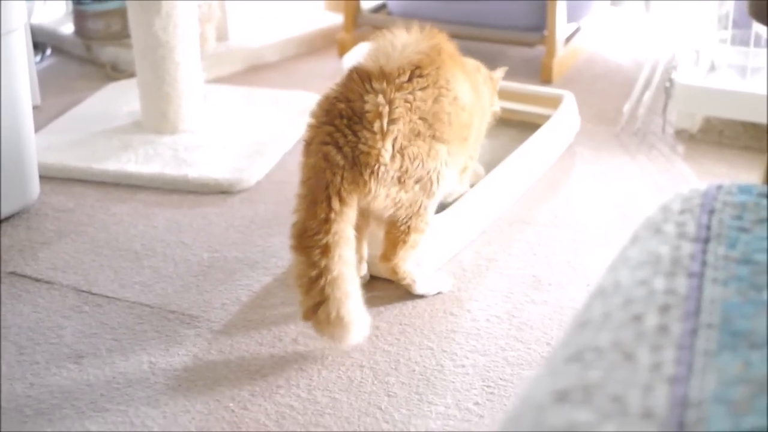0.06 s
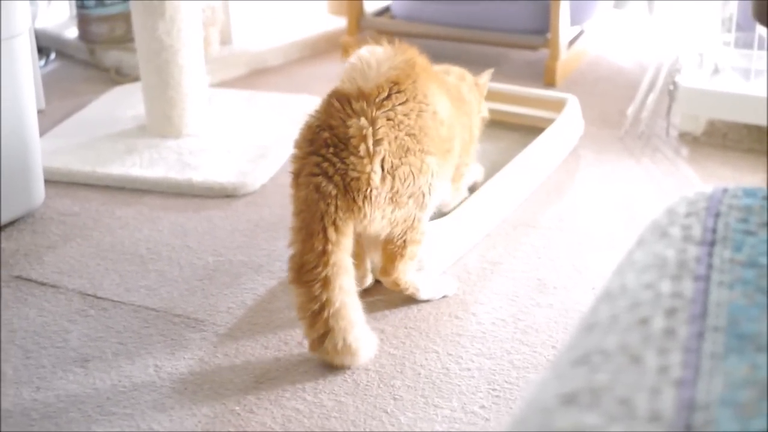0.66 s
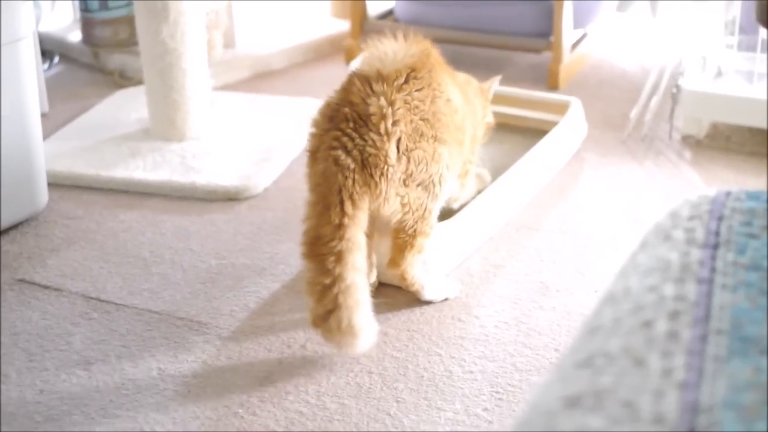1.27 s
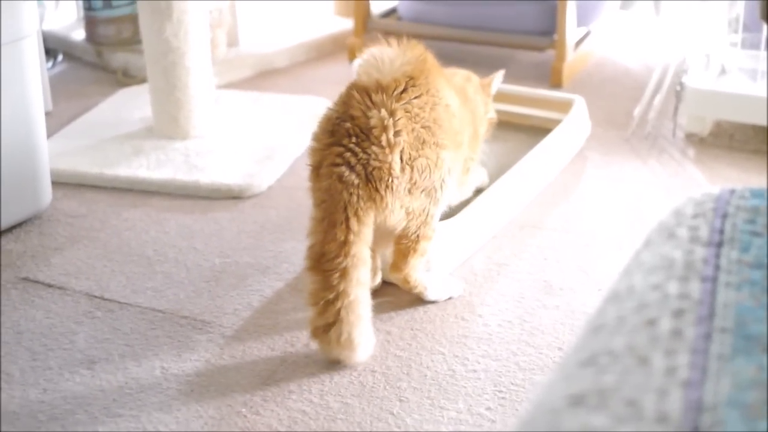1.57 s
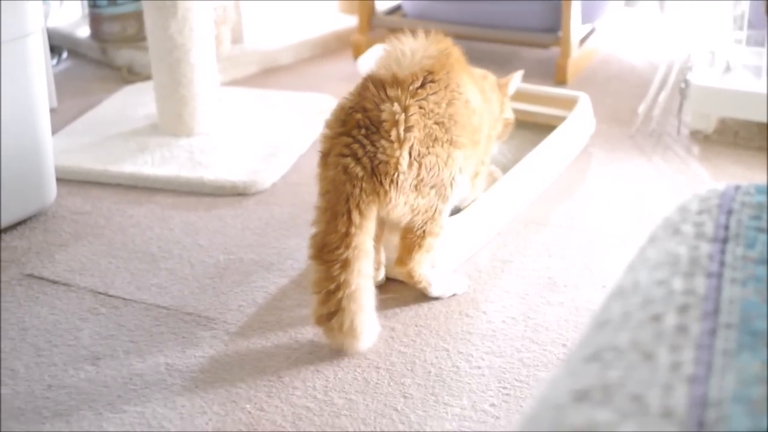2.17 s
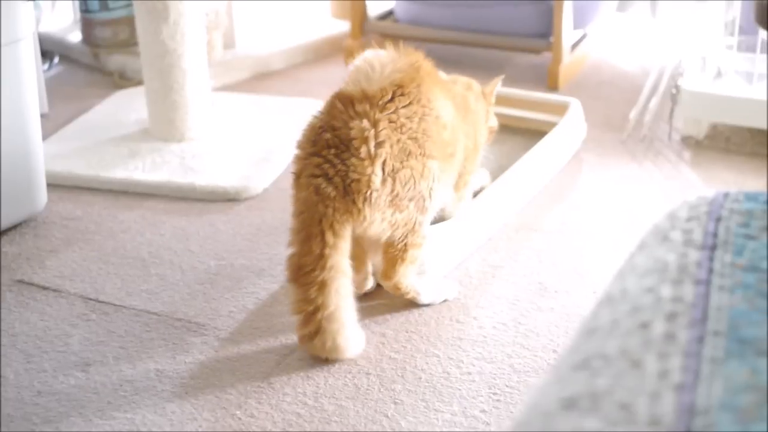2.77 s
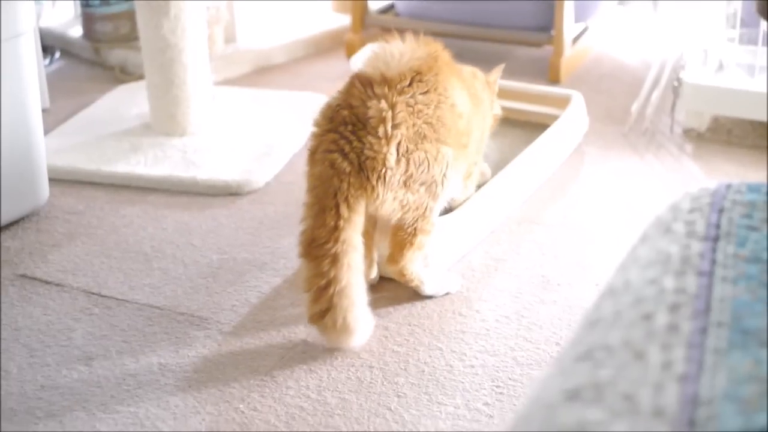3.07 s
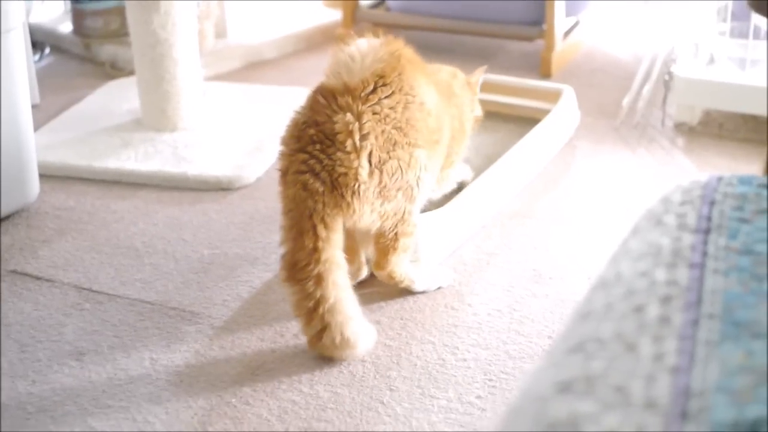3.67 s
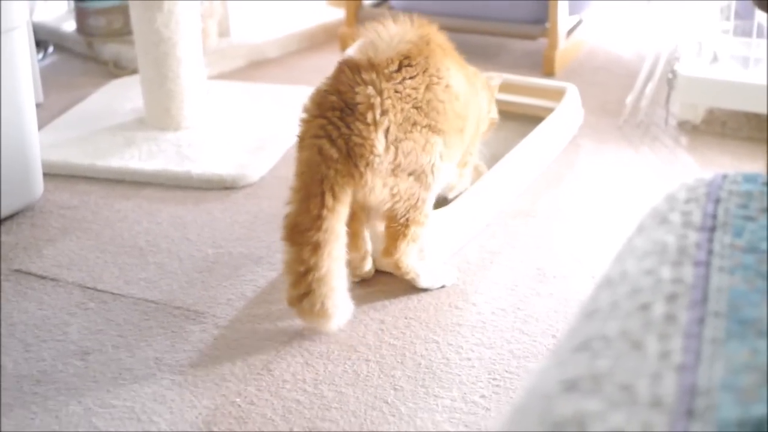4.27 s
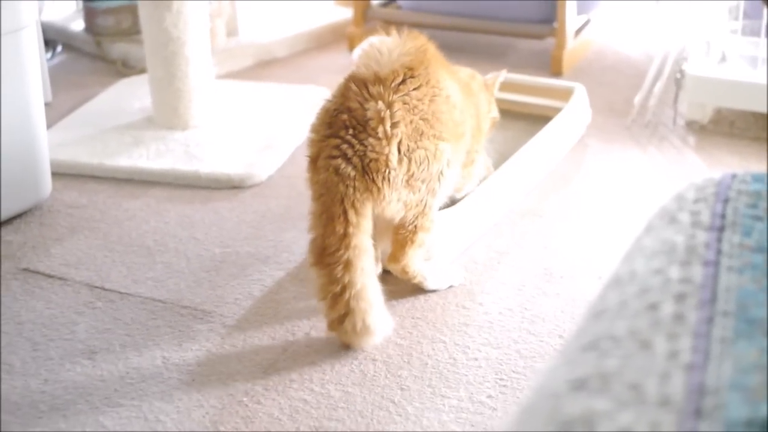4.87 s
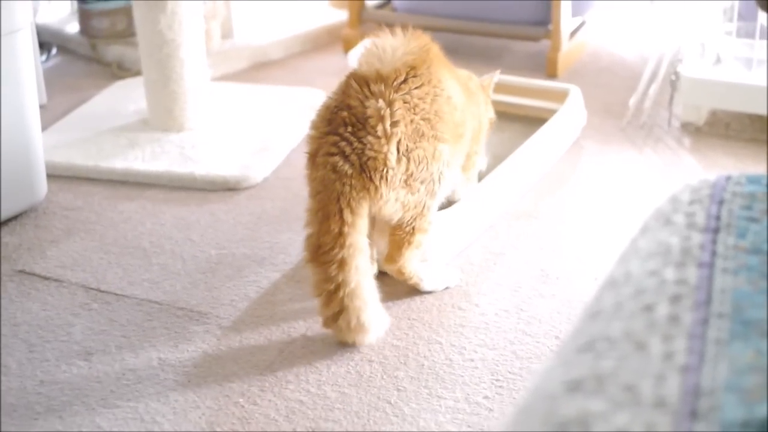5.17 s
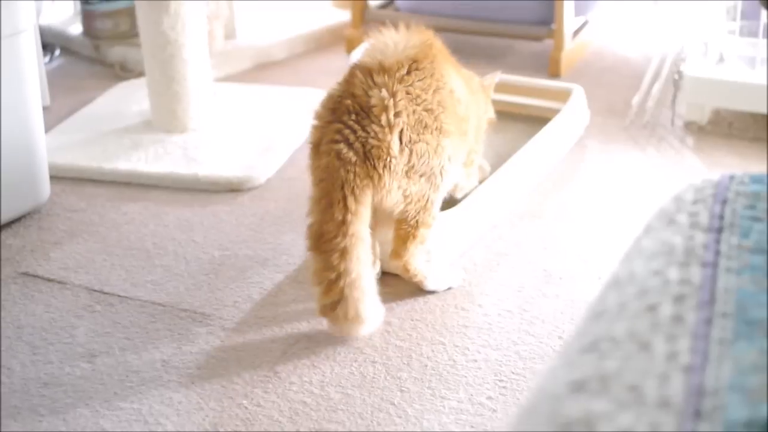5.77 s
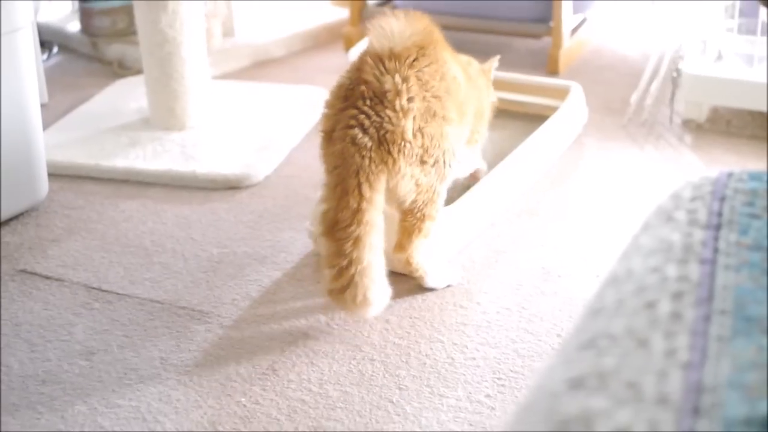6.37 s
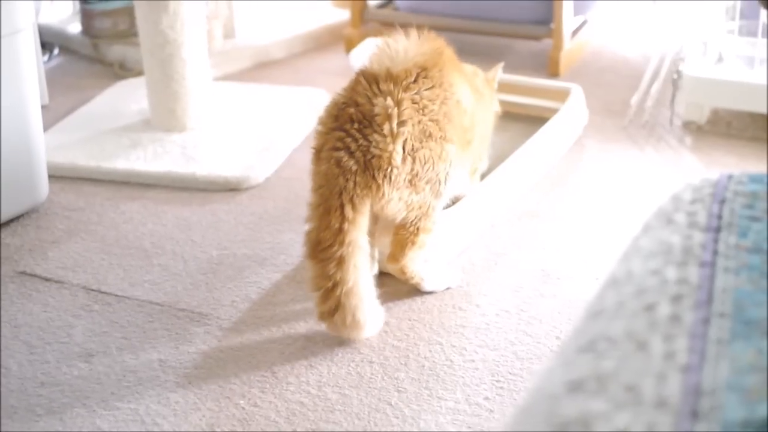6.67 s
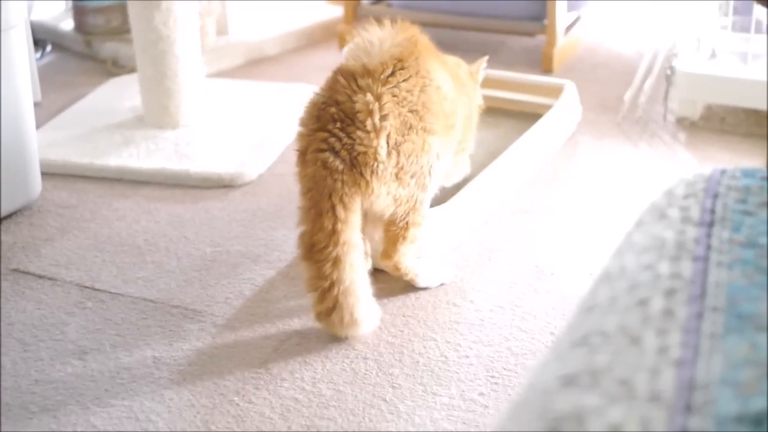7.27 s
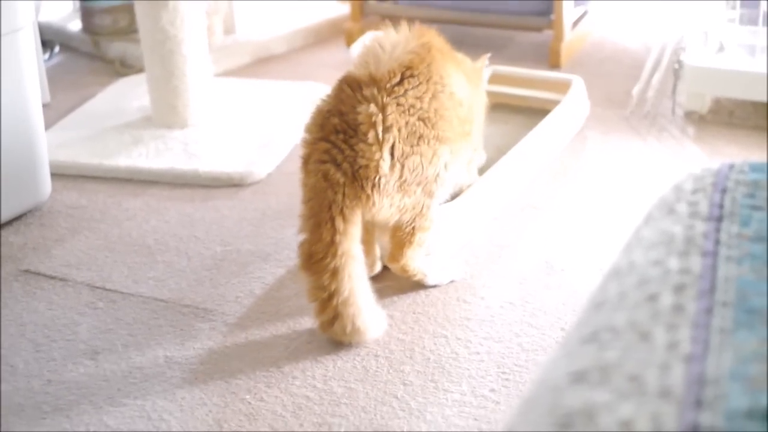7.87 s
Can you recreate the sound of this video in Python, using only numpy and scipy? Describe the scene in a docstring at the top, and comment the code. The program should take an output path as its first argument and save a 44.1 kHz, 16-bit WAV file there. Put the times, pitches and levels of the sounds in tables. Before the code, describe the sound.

Claws tear at cardboard in quick, repeated scratches while the board now and then thuds and clacks in a plastic tray, in a small room.

```python
"""Claws rake a cardboard scratching board, about twice a second, and the board knocks in its plastic tray.
Each of the cat's pulls pierces paper, tears fibres and makes the board grumble; when a claw lets go,
the board drops back with a thud and a clack. Fur brushes the board, with faint squeaks between pulls.
A small carpeted room answers briefly over faint mains hum and hiss."""
import sys
import numpy as np
from scipy import signal
from scipy.fft import rfft, irfft, next_fast_len
from scipy.io import wavfile
from scipy.ndimage import uniform_filter1d, minimum_filter1d

SR = 44100
rng = np.random.default_rng(int(sys.argv[2]) if len(sys.argv) > 2 else 0)


def master(y):
    """Save y as 16-bit WAV."""
    cut = np.clip(np.atleast_2d(y).T, -1, 1)
    pcm = np.round(cut * 32767)  # scale
    wavfile.write(sys.argv[1], SR, pcm.astype(np.int16))


N = 358523


def gain_of(db):
    """Decibels to amplitude."""
    return 10 ** (np.asarray(db) / 20)


def unit_rms(x):
    """Scale to rms 1."""
    return x / np.sqrt(np.mean(x ** 2) + 1e-20)


def unit_energy(x):
    """Scale to energy 1."""
    return x / np.sqrt(np.sum(x ** 2) + 1e-20)


def curve_at(points, hz):
    """Interpolate (freq_hz, value) points on a log-frequency axis."""
    freq_hz, value = np.transpose(points)
    return np.interp(np.log(hz + 1), np.log(freq_hz + 1), value)


def add(mix, start_s, sound):
    """Mix a sound in at start_s."""
    part = mix[max(round(start_s * SR), 0):][:len(sound)]
    part += sound[:len(part)]


def coloured(x, colour):
    """Filter by a (freq_hz, gain_db) curve."""
    size = next_fast_len(len(x))
    gain = gain_of(curve_at(colour, np.fft.rfftfreq(size, 1 / SR)))
    return irfft(rfft(x, size) * gain, size)[:len(x)]


def whitened(x, bins):
    """Level the spectrum by its running mean power; energy 1."""
    spectrum = rfft(x)
    power = uniform_filter1d(abs(spectrum) ** 2, bins)
    return unit_energy(irfft(spectrum / np.sqrt(power + 1e-12), len(x)))


def click(colour, tilt_db_oct=0, size=2048):
    """Minimum-phase click of a given colour, tilted up to 7 kHz; energy 1."""
    hz = abs(np.fft.fftfreq(size, 1 / SR))
    octaves = np.log2(1 + np.minimum(hz, 7000) / 1000)
    log_gain = np.log(gain_of(curve_at(colour, hz) + tilt_db_oct * octaves))
    spectrum = np.exp(np.conj(signal.hilbert(log_gain)))
    return unit_energy(np.fft.ifft(spectrum).real[:size // 2])


def snaps(count, per_s, spread_db):
    """Random train of tiny breaks of uneven size; rms 1."""
    sizes = gain_of(spread_db * np.minimum(rng.exponential(1, count), 4))
    return unit_rms(sizes * rng.choice([-1, 1], count) * (rng.random(count) < per_s / SR))


# hiss spectrum: freq_hz, gain_db
HISS_COLOUR = [(15, -53), (25, -25), (69, -13), (86, -6.5), (122, -3.5), (204, -3), (274, -2), (340, -6),
               (457, -6), (495, -4.5), (1050, -13), (1490, -15), (1850, -14.5), (7910, -23), (15500, -31)]
# hiss side over mid: freq_hz, gain_db
HISS_SIDE = [(60, -11), (110, -5.5), (200, -4.5), (380, 1), (700, 4), (1290, 8.5), (2380, 6.5), (4400, 5.5),
             (8120, 3), (15000, 0.5)]
# mains harmonics: freq_hz, level_db
MAINS_HUM = [(100, -68), (150, -65.5), (200, -64), (250, -66.5), (300, -68.5), (400, -69)]
def background(hiss_db=-53.0):
    """Steady wide hiss and faint centred mains hum."""
    mid = coloured(rng.standard_normal(N), HISS_COLOUR)
    side = coloured(coloured(rng.standard_normal(N), HISS_COLOUR), HISS_SIDE)
    t = np.arange(N) / SR
    hum = sum(np.sqrt(2) * gain_of(db) * np.sin(2 * np.pi * (hz * t + rng.random()))
              for hz, db in MAINS_HUM)
    return gain_of(hiss_db) * np.array([mid + side, mid - side]) / mid.std() + hum


# room decay: freq_hz, t60_s
ROOM_DECAY = [(100, 0.23), (260, 0.21), (700, .28), (1840, 0.27), (4850, 0.21), (12800, 0.17)]
def reverb_tail(count, build_s=0.0022):
    """Diffuse reverberation, each band dying at its own rate."""
    hz, frame_s, bands = signal.stft(rng.standard_normal(count), SR, nperseg=256)
    decay = gain_of(-60 * frame_s / curve_at(ROOM_DECAY, hz)[:, None])
    tail = signal.istft(bands * decay, SR, nperseg=256)[1][:count]
    onset = 1 - np.exp(-np.arange(count) / SR / build_s)
    return whitened(tail * onset, bins=20) * np.sqrt(np.linspace(1, 0, count))


# early reflections: delay_s, relative_gain
REFLECTIONS = [(.0028, 0.35), (.0085, 1), (0.0097, -0.23), (0.0205, 0.19)]
# reverb side over mid: freq_hz, gain_db
REVERB_SIDE = [(100, -18), (350, -23), (700, -13.5), (1400, -4.5), (2800, -2), (5000, 2), (14000, 0.5)]
def room(x, direct_db, wet_db, size=16384):
    """Direct sound, reflections and tail in stereo; each spot on the board has its own wall paths."""
    early = np.zeros(size)
    early[0] = 1
    wall = click([(1500, 1.5), (6000, -3.5), (16000, -5.5)])
    for delay_s, gain in REFLECTIONS:
        add(early, delay_s * rng.uniform(0.92, 1.05), gain * wall / 2)
    mid = gain_of(direct_db) * early + gain_of(wet_db) * reverb_tail(size)
    side = gain_of(wet_db) * coloured(reverb_tail(size), REVERB_SIDE) * np.linspace(1, 0, size)
    return signal.fftconvolve(x[None], np.array([mid + side, mid - side]), axes=1)


# modes of board and tray: freq_hz, relative_db, t60_s
BOARD_MODES = [(143, 2.5, 0.055), (190.7, -1, 0.2), (266, -5, 0.2), (311, -6.5, 0.2), (386, -10.5, 0.33),
               (450, -7, 0.13), (535, -2, 0.046), (600, 6.5, 0.03), (672, -5, 0.37), (781, 1, 0.072),
               (792, -10, 0.27), (883, 5.5, 0.13), (1016, -2.5, 0.16), (1200, -15, 0.37), (1540, -14, 0.2),
               (1464, 5, 0.15), (1595, -2.5, 0.25), (1924, -22, 0.12), (2052, 1.5, 0.057),
               (3520, 5.5, 0.062), (5960, -31, 0.033)]
def board_response(ring_db):
    """Impulse response of the board in its tray: the push itself, then the modes."""
    t = np.arange(SR // 2) / SR
    response = sum(gain_of(db + ring_db - 60 * t / t60_s) * np.cos(2 * np.pi * hz * t)
                   / np.sqrt(t60_s * SR / 28)  # energy independent of decay time
                   for hz, db, t60_s in BOARD_MODES)
    response[0] += 1
    return response


# brushing between reaches, lowest while the cat pauses: time_s, level_db
BRUSH_LEVELS = [(0, -59.5), (1.4, -61.5), (2, -58), (2.4, -62.5), (4.1, -61), (4.65, -74), (5.2, -63),
                (5.9, -74), (6.45, -60), (8.13, -61.5)]
# fur on cardboard: freq_hz, gain_db
FUR_COLOUR = [(200, -16), (800, 7), (3000, 7), (9000, 0.5), (15000, -3)]
def brushing(lead_s=0.02, reach_s=0.14, swell_db=4):
    """Fur and pads rustle on the board, swelling as a paw reaches ahead of each rake."""
    t = np.arange(N) / SR
    reach = sum(np.exp(-((t - start_s + lead_s) / reach_s) ** 2) for start_s, *_ in RAKE_PULLS)
    level = gain_of(np.interp(t, *np.transpose(BRUSH_LEVELS)) + swell_db * reach)
    rustle = unit_rms(coloured(snaps(N, per_s=8300, spread_db=2.0), FUR_COLOUR))
    return room(level * rustle, direct_db=-3.5, wet_db=-2)


# squeaks between pulls: start_s, pitch_hz, level_db
SQUEAK_NOTES = [(.17, 3020, -53), (.33, 2025, -56), (.668, 1690, -53), (3.391, 1662, -54),
                (4.39, 2245, -52), (6.29, 2930, -50), (7.05, 1830, -51)]
def squeaks(length_s=0.041, waver=0.028):
    """Faint, raspy chirps of unsteady pitch."""
    count = round(length_s * SR)
    for start_s, pitch_hz, level_db in SQUEAK_NOTES:
        jitter = unit_rms(uniform_filter1d(rng.standard_normal(SR // 4), 120))[:count]
        phase = 2 * np.pi * np.cumsum(pitch_hz * (1 + waver * jitter)) / SR
        chirp = gain_of(level_db) * np.hanning(count) * np.sin(phase)
        yield start_s, room(chirp, direct_db=0, wet_db=-3)


# board edge on plastic: freq_hz, gain_db
CLACK_COLOUR = [(30, -60), (90, -57), (140, -62), (400, 7), (1000, 21), (2100, 16.5), (3000, 9.5),
                (4200, 1.5), (7000, -5.5), (11000, -29), (16000, -42)]
def knock(thud_db, pitch_hz, clack_db, rise_cycles=0.67, decay_cycles=0.42, crunch_s=0.00091):
    """The board lands with a heavily damped swing; its edge then crunches on the plastic."""
    t = np.arange(2048) / SR
    cycles = pitch_hz * t
    envelope = (1 - np.exp(-cycles / rise_cycles)) * np.exp(-cycles / decay_cycles)
    low_cut = signal.butter(4, 140, "high", fs=SR, output="sos")  # a small board radiates no deep bass
    swing = signal.sosfilt(low_cut, np.sin(2 * np.pi * cycles) * envelope)
    out = gain_of(thud_db) * unit_energy(swing)
    contacts = whitened(rng.standard_normal(len(t)) * np.exp(-t / crunch_s), bins=15)
    clack = gain_of(clack_db) * signal.fftconvolve(contacts, click(CLACK_COLOUR))
    add(out, start_s=0.0006, sound=clack)
    return out


# board landings: start_s, thud_db, pitch_hz, clack_db
BOARD_DROPS = [(.043, -0.5, 800, -33), (.082, 12, 474, -6.5), (.83, -13.5, 533, -36), (1.019, -2, 614, -15),
               (1.0664, 18.5, 481, 12), (1.64, -9, 686, -29), (2.626, -5, 550, -21),
               (3.119, 12.5, 639, 3.5), (4.101, -2.5, 706, -11), (4.2055, 17, 562, 13.5),
               (5.633, 18, 437, 12), (6.347, 13.5, 503, -0.5), (6.576, -13.5, 630, -45),
               (6.864, 9, 402, -7), (7.238, -4.5, 461, -29), (7.574, -14.5, 495, -43)]
def drops(bounce_s=0.0075):
    """The board falls into its tray and bounces once, softer and higher."""
    for start_s, thud_db, pitch_hz, clack_db in BOARD_DROPS:
        landing = knock(thud_db, pitch_hz, clack_db)
        bounce = knock(thud_db - 6, pitch_hz * 1.13, clack_db - 0.5)
        yield start_s, room(landing, direct_db=-7.5, wet_db=-6.5)
        yield start_s + bounce_s, room(bounce, direct_db=-7.5, wet_db=-6.5)


def arch(count, crest):
    """Force through a pull, peaking at the fraction crest of its length."""
    return np.sqrt(np.interp(np.linspace(0, 1, count), [0, crest, 1], [0, 1, 0]))


# fizz of tips piercing paper: freq_hz, gain_db
PIERCE_COLOUR = [(500, -24), (4000, -17), (7000, 3), (8600, 2), (10000, 1.5), (12500, 1), (15000, -8.5)]
# snapping fibres: freq_hz, gain_db
FIBRE_COLOUR = [(100, -35), (500, -4), (1200, -2), (2100, 3), (2800, -1), (3600, 1.5), (5000, -6.5),
                (6500, -8.5), (10000, -15.5), (15000, -22)]
# board under drag: freq_hz, gain_db
GRUMBLE_COLOUR = [(30, -32), (80, -37), (135, -11), (220, -7.5), (400, -1), (620, 2), (850, -4.5),
                  (1300, -11), (2500, -23.5), (8000, -91)]
def pull(length_s, tear_db, grumble_db, tilt_db_oct, fizz_db, tear_crest=0.17):
    """Claw tips pierce, then snap fibres; the board grumbles more as the cat leans in."""
    count = round(length_s * SR)
    tips = unit_rms(snaps(SR // 2, per_s=3100, spread_db=8)[:count])
    fibres = unit_rms(snaps(SR // 2, per_s=1100, spread_db=3)[:count])
    slips = snaps(SR // 2, per_s=1500, spread_db=1)[:count]
    fizz = signal.fftconvolve(tips * arch(count, crest=0.095), click(PIERCE_COLOUR))
    tearing = signal.fftconvolve(fibres * arch(count, tear_crest), click(FIBRE_COLOUR, tilt_db_oct))
    drag = whitened(np.pad(slips * arch(count, crest=0.66), (0, 2048)), bins=12)
    out = gain_of(grumble_db) * np.sqrt(count / 2) * signal.fftconvolve(drag, click(GRUMBLE_COLOUR))
    add(out, 0, gain_of(tear_db) * tearing + gain_of(fizz_db) * fizz)
    return out


def snag(level_db, pitch_hz, release_s=0.004, ring_s=0.00026, snap_db=-6):
    """A caught claw flicks free over a few fibres; each slip snaps and rings it briefly."""
    t = np.arange(1024) / SR
    slips = whitened(snaps(len(t), per_s=4700, spread_db=-0.5) * np.exp(-t / release_s), bins=12)
    ring = unit_energy(np.sin(2 * np.pi * pitch_hz * t) * np.exp(-t / ring_s))
    snap = gain_of(snap_db) * click(FIBRE_COLOUR, tilt_db_oct=2.4)
    return gain_of(level_db) * signal.fftconvolve(slips, ring + snap)


def claws(start_s, length_s, force_db, tilt_db_oct, grumble_rel_db, fizz_rel_db, snag_every_s=0.03):
    """One pull and its snags, with levels relative to the force."""
    fizz_db = min(force_db + fizz_rel_db, -41)  # stops growing once the tips are fully in
    scratch = pull(length_s, force_db, force_db + grumble_rel_db, tilt_db_oct, fizz_db)
    snag_count = max(round(length_s / snag_every_s), 1)
    snag_hz = 3500 * 2 ** (0.054 * tilt_db_oct)  # a brighter pull rings the claw higher
    for k in range(snag_count):
        snag_s = start_s + (k + 0.25) * length_s / snag_count
        yield snag_s, room(snag(force_db + 22.5, snag_hz), direct_db=-5, wet_db=-7)
    yield start_s, room(scratch, direct_db=-8, wet_db=-2.5)


# paw landings between rakes: start_s, force_db, tilt_db_oct
PAW_GRABS = [(.818, -36.5, -2), (1.489, -47.5, -7), (2.886, -37, 0), (3.699, -35, -4.5), (3.941, -48, 4),
             (4.039, -38, 10.5), (4.098, -47, 9), (4.828, -45.5, -5.5), (5.523, -38, 2),
             (6.19, -43.5, -7.5), (6.71, -38, 2), (6.755, -31, 2.5), (7.192, -44.5, -3), (7.687, -34, 4)]
def grabs(length_s=0.025):
    """A paw hooks in with one very short pull that only pricks the surface."""
    for start_s, force_db, tilt_db_oct in PAW_GRABS:
        yield from claws(start_s, length_s, force_db, tilt_db_oct, grumble_rel_db=0, fizz_rel_db=-20.5)


# paws raking in turn: start_s, length_s, force_db, tilt_db_oct, grumble_rel_db, slide_db
RAKE_PULLS = [(.044, 0.032, -25, 2, 5.5, -41), (0.493, 0.075, -32, -4, 5, -49.5),
              (1.041, 0.049, -27.5, -0.5, -0.5, -37.5), (1.608, 0.052, -36, -2, 4, -45),
              (2.133, 0.045, -35.5, -0.5, 3, -51.5), (2.604, 0.071, -36, -4.5, 7.5, -50.5),
              (3.106, 0.023, -31.5, 4.5, 9, -49), (3.517, 0.11, -35.5, -4, 5, -55),
              (4.18, 0.044, -23, -1, 0, -37.5), (5.012, 0.038, -38, 2, 5, -44),
              (5.604, 0.028, -28.5, -2, 0, -47.5), (6.326, 0.033, -38.5, -3, 9, -49),
              (6.841, 0.029, -32.5, 7, 8.5, -57), (7.235, .062, -29.5, -3.5, 2, -47),
              (7.779, 0.021, -24.5, 9.5, -1, -64), (8.113, 0.035, -29.5, -4, 3, -59)]
def rakes(slide_s=0.05, fizz_rel_db=-8.5):
    """The claws slide lightly over the paper, then bite deep and pull."""
    for start_s, length_s, force_db, tilt_db_oct, grumble_rel_db, slide_db in RAKE_PULLS:
        slide = pull(slide_s, tear_db=slide_db, grumble_db=slide_db + 2.5, tilt_db_oct=1.5,
                     fizz_db=slide_db + fizz_rel_db, tear_crest=0.85)
        yield start_s - slide_s, room(slide, direct_db=-10, wet_db=-5.5)
        yield from claws(start_s, length_s, force_db, tilt_db_oct, grumble_rel_db, fizz_rel_db)


def scene():
    """Every touch sounds through the board and the room, over the background."""
    touches = [(0.0012, brushing()), *rakes(), *grabs(), *drops(), *squeaks()]
    mix = np.zeros((2, N))
    for start_s, (left, right) in touches:
        add(mix[0], start_s, left)
        add(mix[1], start_s, right)
    board = board_response(ring_db=-34.5)
    return signal.oaconvolve(mix, board[None], axes=1)[:, :N] + background()


def record(dry, ceiling=0.97, window_samples=300, cutoff_hz=15650):
    """A fast limiter holds the loudest knocks under full scale; a low-pass follows."""
    allowed = np.minimum(1, ceiling / (abs(dry).max(0) + 1e-9))
    gain = uniform_filter1d(minimum_filter1d(allowed, window_samples), window_samples)
    low_pass = signal.firwin(511, cutoff_hz, window=("kaiser", 9), fs=SR)
    return signal.oaconvolve(dry * gain, low_pass[None], "same")


dry = scene()
out = record(dry)
master(out)
```